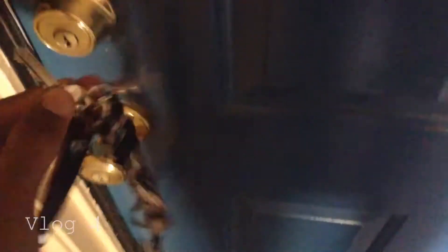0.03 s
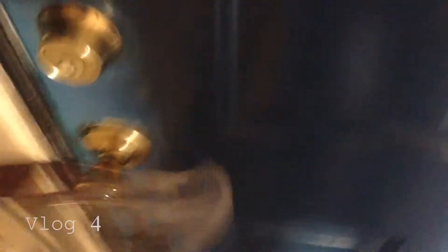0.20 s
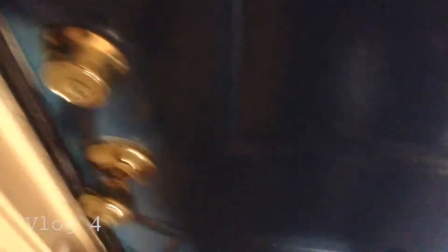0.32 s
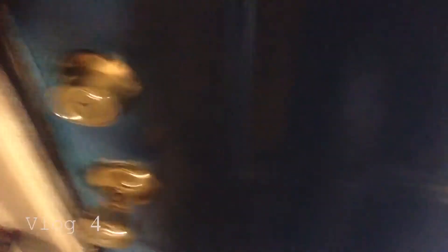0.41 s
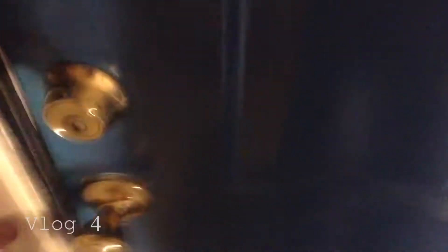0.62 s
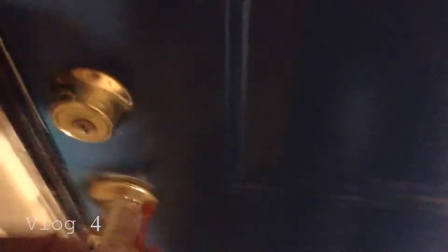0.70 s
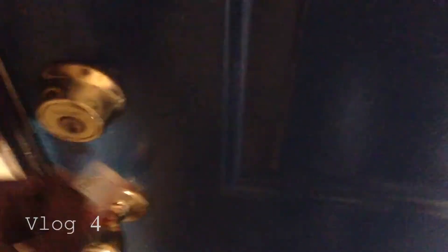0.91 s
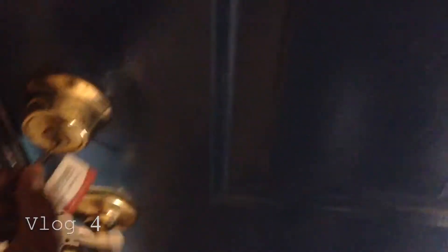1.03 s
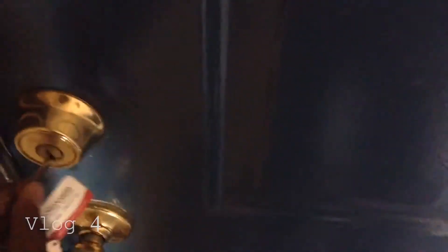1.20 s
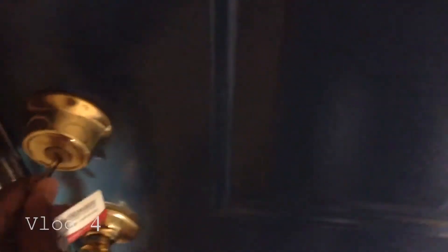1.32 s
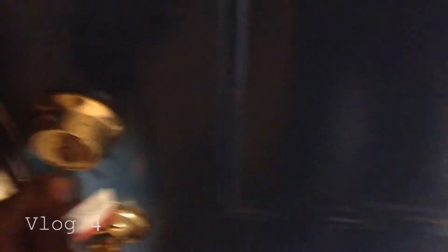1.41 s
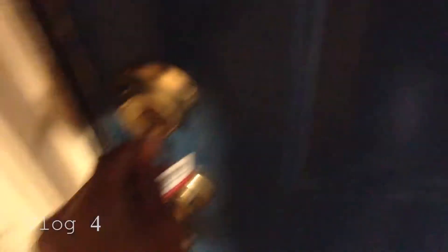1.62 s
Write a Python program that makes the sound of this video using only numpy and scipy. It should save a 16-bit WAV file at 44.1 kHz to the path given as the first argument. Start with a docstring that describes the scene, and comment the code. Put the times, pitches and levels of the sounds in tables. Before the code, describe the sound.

Keys jingle close up, starting with a key scraping out of a door lock at about 0.2 seconds. The bunch jangles brightly, with one hard clink and a soft door bump near 0.5, then thins to light clicks and a key ring ping just before 1.0. The brass lock clacks at 1.05 and 1.25, and the door thumps softly at 1.4. A small hallway echoes over faint rumble and hiss.

```python
"""Keys pulled from a door lock

Close up, the blade scrapes over the pins and the bunch jangles: keys slide, click and ring against each
other, one clinks hard and the key ring pings. Then the brass lock hardware clacks twice. Soft bumps
thump the door panel, and a small hallway answers over a low room rumble and a faint hiss."""
import sys
import numpy as np
from scipy import signal
from scipy.io import wavfile

SR = 44100
rng = np.random.default_rng(int(sys.argv[2]) if len(sys.argv) > 2 else 0)


def transcribe(u):
    """Save the signal u as a 16-bit wav file named by the first command-line argument.

    u: samples, shape (n,) or (channels, n), limited to [-1, 1]; the rate is SR.
    q: integer samples, one column per channel.
    """
    v = np.clip(np.atleast_2d(u).T, -1, 1)
    q = np.round(v * 32767).astype(np.int16)
    wavfile.write(sys.argv[1], SR, q)


N = 72765
T = np.arange(16384) / SR  # time axis of one hit
HZ = np.fft.rfftfreq(len(T), 1 / SR)

# Keys touching each other and the lock: t/s, low/dB, middle/dB, treble/dB, struck spot f/Hz, its level/dB
KEY_CLICKS = [(0.082, -73.5, -68.5, -65.5, 10600, -48.5), (0.123, -50.5, -48, -54, 1154, -50),
              (0.2054, -49, -41, -38, 1640, -50), (0.2118, -28.5, -25, -38, 1600, -23),
              (0.2173, -29.5, -28.5, -38, 3220, -20.5), (0.228, -55.5, -50, -43.5, 13700, -32),
              (0.256, -56, -60, -37, 1590, -49), (0.266, -36.5, -38, -32, 1890, -46),
              (0.274, -33, -31, -28, 2050, -25), (0.28, -35.5, -35, -31, 3680, -21.5),
              (0.31, -65, -55, -34, 1410, -42), (0.327, -41, -39, -29, 8090, -52),
              (0.3339, -25.5, -33, -25, 7970, -25), (0.338, -50, -33.5, -39, 8000, -24),
              (0.363, -59, -32.5, -29.5, 2220, -32), (0.369, -40, -39, -31, 3350, -30),
              (0.379, -26, -45, -20.5, 3056, -23.5), (0.3964, -34, -36, -24, 9310, -23.5),
              (0.426, -47, -35.5, -28.5, 4820, -25.5), (0.447, -60, -36.5, -32, 6420, -28),
              (0.461, -64, -56, -46, 2610, -38.5), (0.4803, -46, -39, -27, 13700, -33),
              (0.5118, -51, -41, -50, 3083, -37.5), (0.5475, -46, -38, -37.5, 3150, -36.5),
              (0.56, -51, -40, -49, 9150, -30), (0.569, -45.5, -39, -40, 5400, -35.5),
              (0.5985, -40.5, -43, -36, 827, -36), (0.685, -40, -42, -35.5, 1760, -37.5),
              (0.694, -36, -39, -25, 4860, -27.5), (0.7271, -52, -40, -42, 2950, -37.5),
              (0.7343, -62, -50, -38, 6970, -32), (0.785, -62, -61, -37.5, 8900, -39),
              (0.793, -40.5, -38.5, -31, 980, -31.5), (0.7962, -39, -38.5, -32, 5000, -50),
              (0.833, -50.5, -45, -42, 3900, -44), (0.852, -72, -45, -42.5, 9000, -31),
              (0.921, -62, -47, -47.5, 9200, -38.5), (1.0273, -78, -41, -42.5, 4950, -38),
              (1.11, -50, -48.5, -43, 9520, -45), (1.335, -59, -52, -50, 3250, -46),
              (1.42, -43, -54, -78.5, 2695, -45.5)]
# Strikes on one small, free-hanging key: t/s, level/dB
SMALL_KEY_HITS = [(.122, -53), (.279, -30), (.312, -34), (.3335, -20), (.369, -28), (.3795, -22.5),
                  (.392, -27), (.694, -39), (.767, -38), (.795, -35), (.853, -43)]
# Modes of the small key, the large key and the key ring: f/Hz, level/dB, t60/s
SMALL_KEY_MODES = [(11552, 0, .075), (11590, -9, .06), (11430, -11, .09), (13848, -14, .09),
                   (9085, -15, .12), (9205, -14, .1), (3674, -17, .12), (3075, -18, .12), (2254, -17, .13)]
LARGE_KEY_MODES = [(9560, 0, .014), (9130, -5, .012), (10050, -10, .01), (9205, -23, .08), (9085, -25, .11),
                   (11550, -15.5, .085), (14200, -15, .018), (6080, -10, .012), (4220, -17, .016)]
KEY_RING_MODES = [(4996, 0, .14), (6374, -13, .3), (13860, -11, .11), (11570, -14, .11), (3763, -19, .3),
                  (2659, -19, .17), (1650, -13, .06)]
# Colour of the large key's crack: f/Hz, level/dB
CRACK_COLOUR = [(100, -53), (2000, -16), (4500, -7.5), (10000, 3), (12800, -8.5), (14400, 2.5),
                (15500, -18)]
# Pitches of the lightly touching keys: f/Hz
CHINK_PITCHES = [2940, 4330, 4760, 6630, 7413, 8040, 9150, 9685, 11560, 12690, 13800]
# Envelopes of the blade in the keyway and of keys sliding over one another: t/s, level/dB
SCRAPE_ENVELOPE = [(0, -53.5), (.07, -69), (.12, -56.5), (.145, -73.5), (.17, -52), (.185, -48.5),
                   (.208, -42.5), (.222, -32), (.24, -34.5), (.28, -35), (.305, -44), (.34, -48.5),
                   (.385, -38), (.41, -56), (.44, -66.5), (.5, -66.5), (.65, -66.5)]
SLIDE_ENVELOPE = [(0, -50), (.07, -67), (.1, -54), (.16, -59), (.25, -46.5), (.31, -40), (.34, -35),
                  (.4, -36), (.42, -41), (.53, -51.5), (.59, -50), (.63, -54.5), (.72, -44.5), (.81, -54.5),
                  (.89, -63.5), (1.02, -54.5), (1.15, -80), (1.36, -62), (1.46, -99.5), (1.65, -78.5)]
# Colours of that scrape and slide: f/Hz, level/dB
SCRAPE_EQ = [(70, -32.5), (150, -7.5), (290, 0), (500, -5), (680, -11.5), (1250, -12.5), (1400, -0.5),
             (2230, 0), (3680, -9.5), (10500, -21.5), (13500, -19.5), (15000, -18.5)]
SLIDE_EQ = [(300, -34.5), (1500, -10.5), (3500, 0.5), (6000, -2.5), (9500, 0), (12000, -6), (15000, -4.5)]
# Brass contacts in the lock's two clacks, knock then latch: t/s, level/dB
KNOCK_HITS = [(1.043, -26.5), (1.0455, -28.5)]
LATCH_HITS = [(1.2418, -36.5), (1.2436, -23.5), (1.2472, -29.5), (1.2494, -24)]
# Colours of those contacts: f/Hz, level/dB
KNOCK_EQ = [(70, -48), (170, -13.5), (760, -16), (1600, -6.5), (2510, -13.5), (3230, -3), (3800, -12.5),
            (6650, -22), (7970, -19), (9550, -14), (12500, -25), (15000, -24)]
LATCH_EQ = [(120, -41.5), (200, -10), (689, -9), (1000, 0.5), (1270, -7.5), (2060, 1), (2940, 1),
            (5130, -2.5), (5920, -13), (7080, 0), (13500, -9), (14500, -7.5)]
# Modes of the brass parts: f/Hz, level/dB, t60/s
KNOCK_RING = [(1090, -22.5, .03), (1165, -39, .2), (1600, -17.5, .024), (2230, -29, .02), (3115, -28, .03),
              (3300, -24.5, .024), (7957, -30, .029), (8640, -22, .014), (11950, -21.5, .014),
              (12880, -32, .027)]
LATCH_RING = [(1018, -24.5, .03), (1467, -31, .035), (1991, -29, .025), (2240, -31, .03), (3222, -29, .03),
              (3515, -30, .025), (7005, -30, .03), (8340, -28, .025)]
# Soft bumps against the door: t/s, level/dB
DOOR_BUMPS = [(0.456, -35), (0.469, -43), (1.041, -43), (1.419, -40)]
# Modes of the door panel: f/Hz, level/dB, t60/s
DOOR_MODES = [(130, -2, .055), (234, -23, 0.073), (331, -3, .04)]
# Decay of the hallway: f/Hz, t60/s
HALL_DECAY = [(300, 1), (1200, 0.42), (3000, 0.62), (6000, 0.4), (14000, 0.13)]
# Colours of the hallway echo, the room rumble and the hiss: f/Hz, level/dB
HALL_EQ = [(300, 2), (1400, 1), (3300, -8.5), (8000, -2.5), (15000, -21)]
RUMBLE_EQ = [(25, -76), (119, 1.5), (206, 2), (298, 2), (430, -18), (630, -8), (760, -25), (1500, -11),
             (1950, -55.5), (3300, -120)]
HISS_EQ = [(300, -7.5), (1000, 21.5), (2000, -9.5), (4000, -23), (8000, -32.5), (15000, -39)]
# Envelope of the rumble: t/s, level/dB
RUMBLE_ENVELOPE = [(0, -51), (.2, -53), (.4, -51.5), (.52, -69), (.8, -59), (1.1, -55), (1.3, -55.5),
                   (1.53, -54), (1.61, -51)]

BAND_TOP_HZ = 15350
ATTACK_S, TICK_DECAY_S = 0.004, 0.00086


def key_clicks():
    """Keys knock together: each touch is a three-band click plus the brief pitch of the struck spot."""
    out = np.zeros(N)
    shapes = [rolloff(1050, 4) * (1 - rolloff(3690, 8)),
              rolloff(3690, 8) * (1 - rolloff(5960, 8)),
              rolloff(5960, 8) / (1 + (HZ / 13970) ** 20)]
    bands = [shape / shape.mean() for shape in shapes]
    for s, *band_dbs, tone_hz, tone_db in KEY_CLICKS:
        power = sum(amp(db) ** 2 * band for db, band in zip(band_dbs, bands))
        add(out, s, tint(key_contact(), np.sqrt(power)))
        add(out, s, ring([(tone_hz, tone_db, 0.032)]))
    return out


def key_contact(snap_s=0.0031, chatter_s=0.0081, partials=90):
    """One touch in the bunch: a spike, a noise snap and the chatter of many keys at random pitches."""
    t = T[T < .06]
    pitch, phase = rng.random((2, partials, 1))
    chatter = unit(np.sin(2 * np.pi * (pitch * BAND_TOP_HZ * t + phase)).sum(0))
    burst = rng.standard_normal(len(t)) * np.exp(-t / snap_s)
    burst += amp(-2) * chatter * np.exp(-t / chatter_s)
    burst[0] += 10  # the spike
    return burst / np.sqrt(np.mean(burst[t < ATTACK_S] ** 2))


def small_key():
    """A free-hanging key rings, its modes in a new balance at every strike."""
    out = np.zeros(N)
    for s, db in SMALL_KEY_HITS:
        add(out, s, amp(db) * ring(SMALL_KEY_MODES, spread_db=4))
    return out


def large_key(at_s=0.4688):
    """A large key clinks hard: a bright crack, then a thin high ring."""
    out = np.zeros(N)
    crack = contact(CRACK_COLOUR, snap_s=0.0015, tail_s=0.012, tail_db=-10.5, spike=0)
    add(out, at_s, amp(-13.5) * crack + amp(-4) * ring(LARGE_KEY_MODES, rise_s=0.0013))
    return out


def key_ring(at_s=0.9667):
    """The key ring pings once and rings out freely."""
    out = np.zeros(N)
    add(out, at_s, amp(-36.5) * ring(KEY_RING_MODES))
    return out


def chinks(touches_per_s=200, t60_s=0.015):
    """Light touches in the swinging bunch tick and ring the same few keys in varying balance."""
    out, t = np.zeros(N), np.arange(N) / SR
    swinging = (t > 0.093) & (t < 1)
    modes = [(hz, 0, t60_s) for hz in CHINK_PITCHES]
    for _ in modes:
        force = swinging * rng.uniform(-1.27, 1, N)
        touches = force * (rng.random(N) < touches_per_s / len(modes) / SR)
        snap = rng.standard_normal(len(T)) * np.exp(-T / TICK_DECAY_S)
        tick = amp(1) * unit(tint(snap, eq(SLIDE_EQ)))
        chink = tick + unit(ring(modes, spread_db=1))
        out += signal.oaconvolve(touches, chink)[:N]
    return level(SLIDE_ENVELOPE) * out / out[swinging].std()


def friction(envelope, colour, slips_per_s=6000, spread_db=1.5):
    """Metal rubs on metal: tiny slips of uneven size over a smooth noise bed."""
    size = amp(spread_db * np.minimum(rng.exponential(1, N), 4))
    slips = rng.standard_normal(N) * size * (rng.random(N) < slips_per_s / SR)
    rub = unit(slips) + 0.35 * rng.standard_normal(N)
    return level(envelope) * unit(tint(rub, eq(colour)))


def lock_clack(hits, colour, modes):
    """Heavy brass parts meet in a few quick contacts and ring briefly."""
    out = np.zeros(N)
    for s, db in hits:
        add(out, s, amp(db) * contact(colour, snap_s=TICK_DECAY_S, tail_s=0.018, tail_db=-12, spike=3.3))
    add(out, hits[0][0], ring(modes, rise_s=0.00082))
    return out


def contact(colour, snap_s, tail_s, tail_db, spike):
    """A hard metal hit: an optional spike, a noise snap and a softer tail, coloured by the part."""
    envelope = np.exp(-T / snap_s) + amp(tail_db) * np.exp(-T / tail_s)
    burst = rng.standard_normal(len(T)) * envelope
    burst[0] += spike
    burst /= np.sqrt(np.mean(burst[T < ATTACK_S] ** 2))
    return tint(burst, unit(eq(colour)))


def door():
    """The door panel gives a dull thump when it is bumped."""
    out = np.zeros(N)
    for s, db in DOOR_BUMPS:
        add(out, s, amp(db) * ring(DOOR_MODES, rise_s=0.003))
    return out


def hallway(send, build_s=0.0025):
    """The walls return a diffuse echo whose treble dies first."""
    hz, t, spectrum = signal.stft(rng.standard_normal(SR // 2), SR, nperseg=256)
    decay = np.exp(-np.log(1000) * t / read(HALL_DECAY, hz)[:, None])
    tail = signal.istft(spectrum * decay, SR)[1]
    tail *= np.minimum(np.arange(len(tail)) / SR / build_s, 1)
    response = tint(tail / np.linalg.norm(tail), eq(HALL_EQ))
    return signal.fftconvolve(send, response)[:N]


def room_tone():
    """A low room rumble dips and swells over a faint, steady hiss."""
    rumble = tint(rng.standard_normal(N), eq(RUMBLE_EQ) / (1 + (HZ / 1200) ** 4))
    hiss = tint(rng.standard_normal(N), eq(HISS_EQ))
    return level(RUMBLE_ENVELOPE) * unit(rumble) + amp(-64) * unit(hiss)


def ring(modes, spread_db=0, rise_s=0.00045):
    """A struck body: decaying sines with random phases, their levels scattered by spread_db."""
    hz, db, t60 = np.transpose(modes)[:, :, None]
    phase = rng.random((len(modes), 1))
    gain = amp(db + spread_db * rng.standard_normal((len(modes), 1)))
    waves = gain * np.exp(-np.log(1000) * T / t60) * np.sin(2 * np.pi * (hz * T + phase))
    return waves.sum(0) * (1 - np.exp(-T / rise_s))


def tint(x, gain):
    """Minimum-phase filter with the given gain at HZ; keeps attacks crisp."""
    log_gain = np.log(np.maximum(gain, 1e-5))
    mirrored = np.concatenate([log_gain, log_gain[-2:0:-1]])
    taps = np.fft.ifft(np.exp(np.conj(signal.hilbert(mirrored)))).real
    return signal.fftconvolve(x, taps[:len(T) // 4])[:len(x)]


def rolloff(edge_hz, slope):
    """Low-cut curve over HZ."""
    return 1 / (1 + (edge_hz / (HZ + 1)) ** slope)


def read(points, hz):
    """Reads a table on a log-frequency axis."""
    f, value = np.transpose(points)
    return np.interp(np.log(hz + 1), np.log(f + 1), value)


def eq(colour):
    """Gain over HZ from rows of f/Hz, level/dB."""
    return amp(read(colour, HZ))


def level(envelope):
    """Gain over time from rows of t/s, level/dB."""
    return amp(np.interp(np.arange(N) / SR, *np.transpose(envelope)))


def amp(db):
    """Decibels to gain."""
    return 10 ** (np.asarray(db) / 20)


def unit(x):
    """Scales to rms 1."""
    return x / np.sqrt(np.mean(x ** 2) + 1e-20)


def add(mix, s, sound):
    """Mixes a sound in at s seconds."""
    part = mix[round(s * SR):][:len(sound)]
    part += sound[:len(part)]


def scene():
    """Keys and lock up front, both sent to the hallway; door and room tone underneath, in mono."""
    bunch = key_clicks() + small_key() + key_ring() + large_key() + chinks()
    bunch += friction(SCRAPE_ENVELOPE, SCRAPE_EQ) + friction(SLIDE_ENVELOPE, SLIDE_EQ)
    lock = lock_clack(KNOCK_HITS, KNOCK_EQ, KNOCK_RING) + lock_clack(LATCH_HITS, LATCH_EQ, LATCH_RING)
    echo = hallway(amp(-13) * bunch + amp(-12.5) * lock)
    return (bunch + lock + door() + echo + room_tone())[None]


def record(dry):
    """The recorder rounds off the highest peaks and limits the band."""
    ceiling = 0.7
    rounded = dry / (1 + (dry / ceiling) ** 4) ** .25
    lowpass = signal.firwin(201, BAND_TOP_HZ, window=("kaiser", 8), fs=SR)
    return signal.oaconvolve(rounded, lowpass[None], "same")


dry = scene()
out = record(dry)
transcribe(out)
```